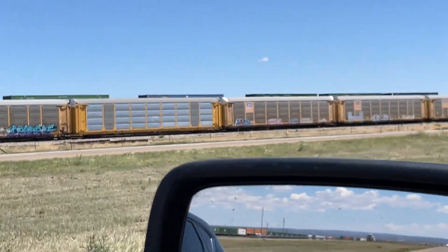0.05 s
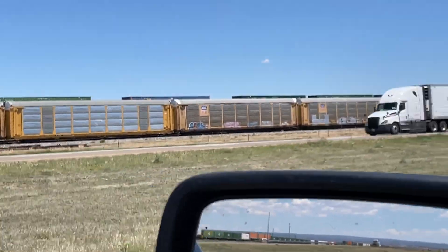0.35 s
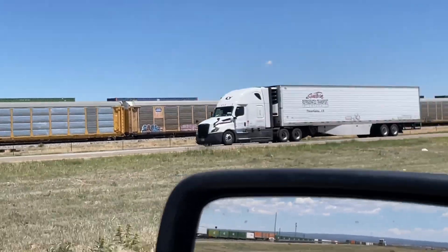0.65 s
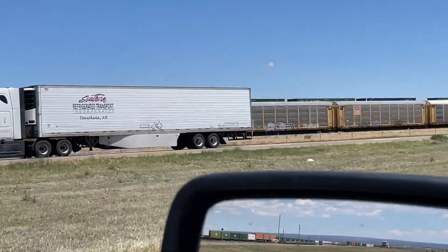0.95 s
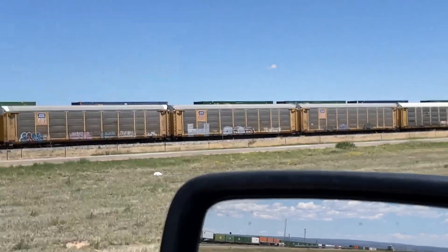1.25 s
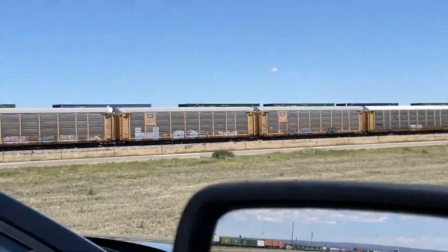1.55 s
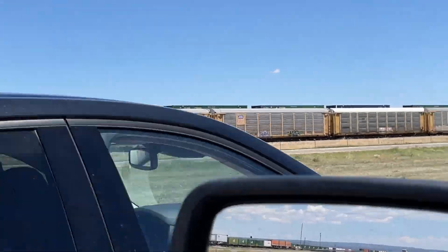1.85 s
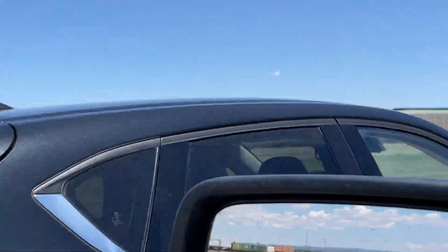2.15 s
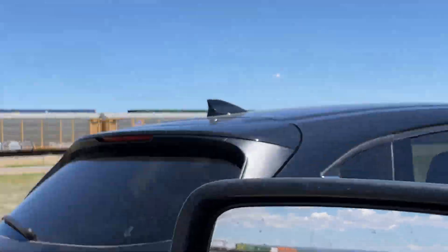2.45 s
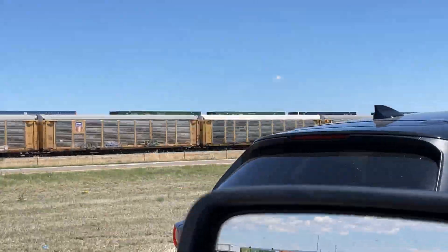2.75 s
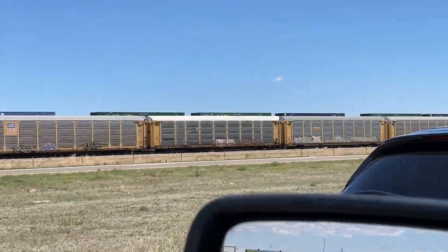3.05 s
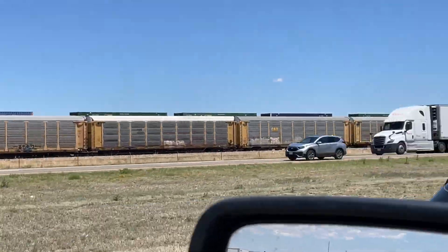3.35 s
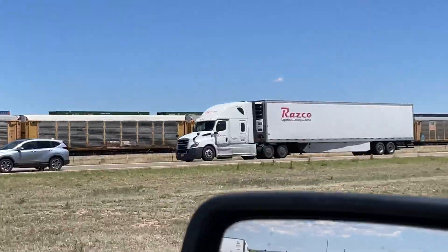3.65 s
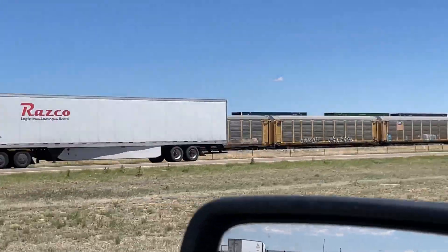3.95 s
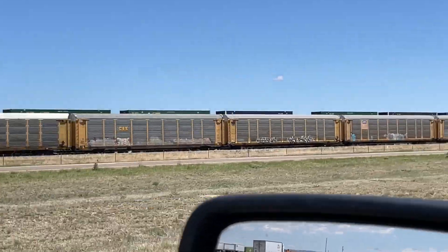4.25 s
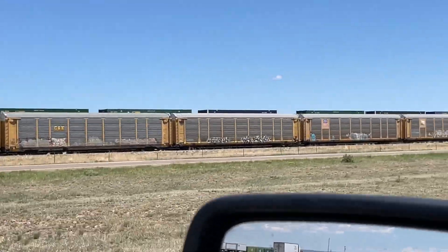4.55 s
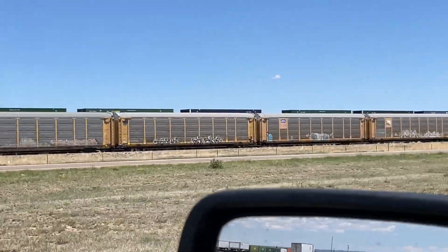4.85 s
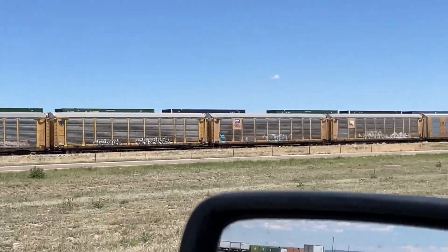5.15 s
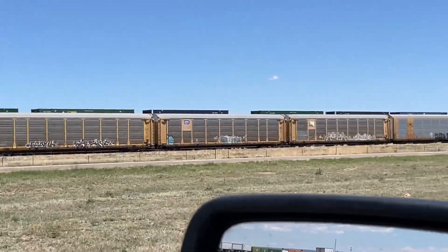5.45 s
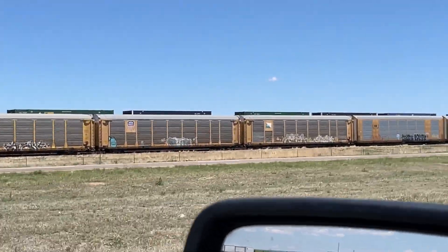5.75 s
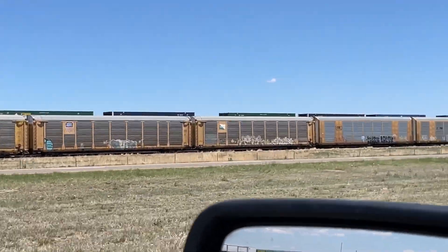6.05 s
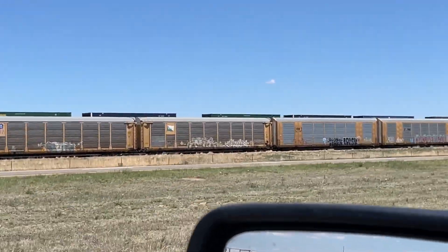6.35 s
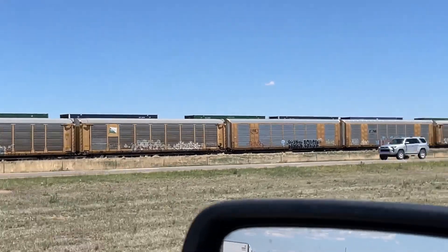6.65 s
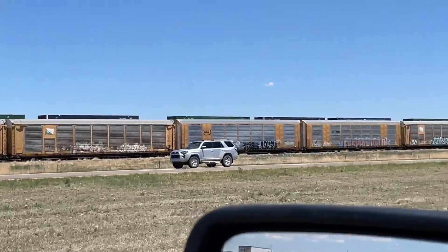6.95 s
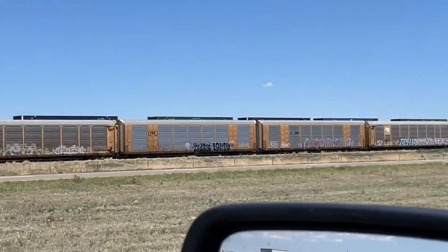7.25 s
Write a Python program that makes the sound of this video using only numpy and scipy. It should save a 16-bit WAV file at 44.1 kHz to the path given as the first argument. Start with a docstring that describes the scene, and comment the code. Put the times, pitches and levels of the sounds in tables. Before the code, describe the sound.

Heard through a phone at the open window of a moving car, a heavy, fluttering wind rumble runs from start to end over tyre noise and airy hiss. The road roar rises as a vehicle passes early on, then again more faintly. Sharp wind pops strike the microphone, the hardest briefly dulling the other noise, and something loose squeaks and chatters lightly on the bumps.

```python
"""At the open side window of a car at highway speed, heard through a phone's two microphone ports.
Air buffets the opening into a deep throb, the slipstream hisses, and eddies pop and knock on the mic.
Tyres roar, and the roar swells twice as other vehicles go by.
A loose fitting in the car squeaks and chatters on the bumps.
Sharp pops duck everything above the bass, and a limiter holds the peaks down."""
import sys
import numpy as np
from scipy import signal
from scipy.fft import rfft, irfft
from scipy.io import wavfile
from scipy.ndimage import uniform_filter1d, minimum_filter1d

SR = 44100
rng = np.random.default_rng(int(sys.argv[2]) if len(sys.argv) > 2 else 0)


def unload_audio(sound):
    """Save the sound as a 16-bit wav file, at the path given as the first command line argument."""
    columns = np.transpose(np.atleast_2d(sound))
    # keep every value between -1 and 1, then stretch to whole-number steps
    steps = np.round(np.clip(columns, -1, 1) * 32767)
    wavfile.write(sys.argv[1], SR, steps.astype(np.int16))


N = 322371
T = np.arange(N) / SR
FREQS = np.arange(N // 2 + 1) * SR / N
LEFT_RIGHT = np.array([[1], [-1]])


def undb(db):
    """Decibels to gain."""
    return 10 ** (np.asarray(db) / 20)


def unit(x):
    """Scale to rms 1."""
    return x / np.sqrt(np.mean(x ** 2))


def pan(lean_db):
    """Stereo gains that put the left lean_db above the right."""
    return undb(lean_db * LEFT_RIGHT / 2)


def automation(table):
    """Join (time, value) breakpoints at every sample."""
    return np.interp(T, *np.transpose(table))


def across(points):
    """Join (frequency, value) breakpoints over log frequency."""
    hz, value = np.transpose(points)
    return np.interp(np.log(FREQS + 1), np.log(hz), value)


def eq(x, response):
    """Filter by a frequency response."""
    return irfft(rfft(x) * response, N)


def high_cut(hz):
    """A soft low-pass response, 6 dB down at hz."""
    return 1 / (1 + (FREQS / hz) ** 4)


def noise(points):
    """Noise of a given spectrum, rms 1."""
    return unit(eq(rng.standard_normal(N), undb(across(points))))


def drift(rate):
    """Smooth random modulation, about rate changes a second, rms 1."""
    return unit(eq(rng.standard_normal(N), np.exp(-(FREQS / rate) ** 2)))


def add(track, start, sound):
    """Mix a short sound into a track at start seconds."""
    first = int(np.clip(start * SR, 0, N))
    track[first:first + len(sound)] += sound[:N - first]


# centre pitch of the throb: (time [s], pitch [Hz])
THROB_PITCH = [(0, 77.4), (.3, 76.2), (.62, 87.7), (.78, 66), (.95, 86.1), (1.3, 80.53), (1.55, 72.95),
               (2.0, 76.24), (2.17, 91.2), (2.38, 86.86), (2.5, 73.74), (3.0, 73), (3.48, 65.18),
               (3.63, 84.06), (3.93, 71.02), (4.25, 81), (4.4, 67.75), (4.72, 69), (4.92, 80.17),
               (5.32, 81), (5.58, 70), (6.15, 80.35), (6.45, 70), (6.78, 83.26), (7.0, 73.1), (7.3, 87.3)]
# boom of the cabin air: (frequency [Hz], relative level [dB])
CABIN_SPECTRUM = [(10, -16.5), (22, -20.5), (32, -12.5), (45, -8), (58, 2.5), (80, -3), (100, .5),
                  (125, -7), (160, -17), (220, -26.5), (300, -37), (600, -120)]
# colour of the turbulent flutter: (frequency [Hz], relative level [dB])
FLUTTER_SPECTRUM = [(70, -26), (130, -1.5), (220, 1.5), (350, -8), (600, -16.5), (1500, -29), (4000, -70.5)]
# fader ride on the flutter: (time [s], level [dB])
FLUTTER_LEVEL = [(0, -28.5), (1.0, -26.5), (1.6, -24), (2.1, -29.5), (2.9, -25.5), (3.8, -25), (4.4, -29.5),
                 (5.3, -26.5), (6.2, -27.5), (7.3, -22.5)]


def buffet(level_db=-6.5, wander_hz=1.509, width_hz=12, steady_s=0.14, hold_s=0.04, knee=1.54):
    """Vortices shed at the window edge pump the cabin air at a wandering rate; turbulence flutters."""
    pitch = automation(THROB_PITCH) + wander_hz * drift(2.59)
    phase = 2 * np.pi * np.cumsum(pitch) / SR
    shedding = unit(drift(width_hz) * np.cos(phase) + drift(width_hz) * np.sin(phase))
    swing = unit(shedding + undb(-0.45) * noise(CABIN_SPECTRUM))
    # the steady airstream feeds it evenly, and its largest swings saturate
    swing = swing / np.sqrt(uniform_filter1d(swing ** 2, int(steady_s * SR) + 1))
    strength = uniform_filter1d(np.abs(signal.hilbert(swing)), int(hold_s * SR) + 1)
    swing = unit(swing / (1 + (strength / knee) ** 4) ** (1 / 4))
    side = undb(-17) * noise(CABIN_SPECTRUM) * LEFT_RIGHT
    throb = (swing + side) * undb(level_db) * pan(0.5)
    flicker = undb(6 * drift(41))
    turbulence = noise(FLUTTER_SPECTRUM) + undb(-22) * noise(FLUTTER_SPECTRUM) * LEFT_RIGHT
    return throb + undb(automation(FLUTTER_LEVEL)) * unit(flicker * turbulence)


# colour of the tyre roar: (frequency [Hz], relative level [dB])
ROAD_SPECTRUM = [(150, 4.5), (300, 3.5), (480, 1), (620, 3), (780, 2), (860, 4.5), (950, -1), (1030, 1.5),
                 (1190, 3), (1270, -0.5), (1450, -3.5), (1750, -13.5), (2500, -21), (4000, -26),
                 (7000, -35)]
# its stereo width: (frequency [Hz], side minus mid [dB])
ROAD_WIDTH = [(200, -9), (400, -7), (650, -2.5), (1000, -7), (2000, -14.5)]
# its lean to the window: (frequency [Hz], left minus right [dB])
ROAD_PAN = [(200, 0.92), (500, 2), (1100, 6), (2000, 0.5)]
# pass-bys: (time when nearest [s], level [dB], fall to half power [s])
PASS_BYS = [(1.58, -26, 0.49), (3.85, -35, 0.84)]


def road(tyres_db=-27, ease_db_per_s=0.34, waver_db=0.5):
    """This car's tyres roar and slowly ease off; passing vehicles swell and fade with distance."""
    side = eq(noise(ROAD_SPECTRUM), undb(across(ROAD_WIDTH)))
    roar = eq(noise(ROAD_SPECTRUM) + side * LEFT_RIGHT, pan(across(ROAD_PAN)))
    own_power = undb(tyres_db - ease_db_per_s * T) ** 2
    passing_power = sum(undb(db) ** 2 / (1 + ((T - nearest) / half_s) ** 2)
                        for nearest, db, half_s in PASS_BYS)
    return roar * np.sqrt(own_power + passing_power) * undb(waver_db * drift(4.8))


# colour of the slipstream: (frequency [Hz], relative level [dB])
HISS_SPECTRUM = [(900, -11.5), (2000, 12), (3200, 8.5), (4500, 3), (6000, -0.5), (7300, 3), (8700, 3),
                 (10500, 1.5), (12000, -5.5), (14500, -2.5), (16000, -9.5)]
# its stereo width: (frequency [Hz], side minus mid [dB])
HISS_WIDTH = [(2000, -15.5), (4500, -3.5), (8000, -17), (11000, -35)]
# airflow past the window, riding the hiss: (time [s], treble gain [dB])
AIRFLOW_RIDE = [(0, 5), (.65, 4), (1.3, 7), (2.15, 4.5), (3.15, 0.2), (4.6, -2), (5.3, 1), (6.4, -3.5),
                (7.05, -0.5), (7.3, 5)]


def slipstream(level_db=-45.5, flicker_db=1.5, mid_share=0.66, treble_hz=5500):
    """Air shears past the mirror and window frame; more airflow makes it louder and brighter."""
    hiss = noise(HISS_SPECTRUM) + eq(noise(HISS_SPECTRUM), undb(across(HISS_WIDTH))) * LEFT_RIGHT
    mids = eq(hiss, high_cut(treble_hz))
    flow_db = automation(AIRFLOW_RIDE)
    rush = mids * undb(mid_share * flow_db) + (hiss - mids) * undb(flow_db)
    return rush * undb(level_db + flicker_db * drift(27))


# squeak cues: (time [s], relative level [dB], rise [s], trim on the low partials [dB])
SQUEAK_CUES = [(0.16, -46.5, .03, -3), (0.785, -40, 0.031, -4), (1.922, -49, 0.023, -5),
               (2.525, -52, .025, -3), (3.365, -47, 0.023, 1), (3.635, -50, 0.018, 0),
               (4.22, -38.5, 0.017, -12), (5.095, -44.5, 0.025, -5), (5.378, -47.5, .02, 3),
               (5.972, -42.5, .04, 0.5), (6.818, -47, .02, 0), (7.09, -49, .024, -3)]
# the notes in a squeak: (frequency [Hz], relative level [dB])
SQUEAK_PARTIALS = [(2600, -5.5), (3967, -6.5), (4360, -12), (5163, -0.5), (5430, -11.5), (7305, -18),
                   (7806, -15), (10244, -17), (13232, -24), (14583, -23)]


def squeaks(gain_db=2, scrape_db=-4, low_hz=4700, waver=0.004, rough_db=1.8):
    """The loose fitting rubs and sings briefly on nearly steady partials, with a little dry scrape."""
    rub, low_rub = np.zeros((2, N))
    for start, db, rise, low_db in SQUEAK_CUES:
        age = T[:SR // 4] / rise
        swell = undb(db) * age ** 2 * np.exp(2 * (1 - age))
        add(rub, start, swell)
        add(low_rub, start, undb(low_db) * swell)
    scrape = noise([(1500, -16.0), (2600, -5.5), (8000, -7.0), (15000, -3.5)])
    out = rub * undb(scrape_db) * scrape
    for hz, db in SQUEAK_PARTIALS:
        phase = 2 * np.pi * np.cumsum(hz * (1 + waver * drift(220))) / SR
        roughness = unit(undb(rough_db * drift(90)))
        envelope = low_rub if hz < low_hz else rub
        out += envelope * undb(db) * roughness * np.sin(phase)
    return out * undb(gain_db) * pan(2)


def eddy(hz, end_hz, length, fall_s=0.001304, attack_s=0.0005, rough=0.46, crack_hz=2250):
    """An eddy pops on the port: a ragged flick, then pressure swings that drop in pitch and die."""
    t = T[:SR // 25]
    flick = np.exp(-t / fall_s)
    pitch = end_hz + (hz - end_hz) * flick
    swings = np.sqrt(end_hz / pitch) * np.sin(2 * np.pi * np.cumsum(pitch) / SR)
    ragged = unit(signal.sosfilt(signal.butter(4, hz, fs=SR, output="sos"), rng.standard_normal(len(t))))
    envelope = (1 - np.exp(-t / attack_s)) * np.exp(-(t / length) ** 3)
    dull = signal.butter(6, crack_hz, fs=SR, output="sos")
    return signal.sosfilt(dull, envelope * (swings + rough * np.sqrt(flick) * ragged))


# strong wind pops: (time [s], level [dB], starting pitch [Hz], final pitch [Hz], length [s])
EDDY_CUES = [(0.303, -15.5, 600, 298, 0.0062), (0.542, -9.5, 1080, 447, .004),
             (0.556, -10.5, 700, 298, 0.0053), (0.94, -11, 500, 256.8, 0.0065),
             (1.426, -10, 600, 230, 0.0062), (1.548, -9.5, 906, 447, .005),
             (2.4275, -3.5, 1602, 294, 0.0075), (2.694, -9.5, 520, 246, 0.0074),
             (2.821, -16.5, 800, 409.7, 0.0082), (2.939, -14, 1210, 296, 0.0056),
             (3.055, -16.5, 697.6, 277.5, 0.0047), (3.623, -5.5, 800, 389.4, 0.0069),
             (3.6755, -6.5, 1280, 254.7, .011), (4.044, -9, 1170, 274, 0.0099),
             (4.254, -7.5, 2200, 268, 0.01), (4.267, -6.5, 794, 380, 0.0054), (4.48, -14, 492, 340, 0.011),
             (4.539, -12, 590.6, 301.4, 0.0058), (4.557, -11, 598.7, 321.5, 0.0056),
             (4.604, -13, 700, 328, 0.0047), (5.511, -12, 816, 295, 0.0072), (5.685, -16, 800, 403, 0.0036),
             (5.6885, -2, 1930, 304, 0.0105), (5.691, -9, 776, 599.4, 0.0036),
             (5.703, -11, 700, 420, 0.0075), (5.722, -14, 650, 400, 0.0031),
             (6.156, -13, 917.4, 337, 0.0067), (7.065, -14, 499.6, 260, 0.0074)]


def eddies(small_count=30, small_db=-25, scatter_db=3):
    """Strong eddies strike the microphone on cue, among small ones scattered at random."""
    out = np.zeros(N)
    for start, db, hz, end_hz, length in EDDY_CUES:
        add(out, start, undb(db) * eddy(hz, end_hz, length))
    for when, size, pitch in rng.random((small_count, 3)):
        pop = eddy(350 + 450 * pitch, 220 + 180 * pitch, length=0.0037)
        add(out, when * N / SR, undb(small_db + scatter_db * size) * pop)
    return out * pan(1)


# bumps that shake the fitting: (time [s], level [dB], decay [s], relative level of the low modes [dB])
CHATTER_CUES = [(.325, -27, 0.026, -3), (.340, -31, 0.011, 13.5), (.78, -39, 0.044, 5),
                (1.623, -38.5, 0.064, 0), (2.07, -32.5, 0.028, 5), (2.504, -43, 0.056, 4),
                (3.354, -39, 0.045, -1), (3.782, -30.5, 0.032, 1), (4.213, -38, 0.05, 1),
                (5.095, -37.5, 0.063, -4), (5.529, -29, 0.029, 3), (5.967, -37.5, 0.018, 2),
                (6.403, -31, 0.019, -3), (6.622, -34, 0.032, 0.5), (6.709, -29.5, .028, -4),
                (6.808, -33, 0.024, 1), (7.233, -32, 0.18, 0.5)]
# ring of the fitting: (frequency [Hz], bandwidth [Hz], relative level [dB])
FITTING_MODES = [(3010, 46, 6), (3280, 60, 4.5), (3660, 50, 4.5), (4030, 70, -7.5), (4120, 120, -2.5),
                 (4610, 88, -0.5), (4880, 42, 0.5), (5230, 80, -4), (6640, 78, 1.5), (7060, 86, 3.5),
                 (7260, 80, 7), (7870, 110, 7.5), (8120, 95, 3), (8650, 81, -1), (9200, 74, 2.5),
                 (9770, 130, -1.5), (11900, 100, -4.5), (12550, 120, -12), (13676, 70, -13),
                 (14600, 330, -18)]


def chatter(stop_s=0.012, build_s=0.0034, low_hz=4000, detune=0.0026, grain_db=4, dry_db=-11):
    """Each bump shakes the loose fitting into a dying run of dense contacts that ring its modes."""
    t = T[:SR // 2]
    freqs = np.fft.rfftfreq(len(t), 1 / SR)
    click_db = across([(2000, -12.5), (3000, 9.0), (5800, 0.5), (8500, -3.0),
                       (11000, -11.5), (14700, -3), (16000, -13.5)])
    click = np.interp(freqs, FREQS, undb(dry_db + click_db))
    low_band = 1 / (1 + (freqs / low_hz) ** 20)
    grain = unit(undb(grain_db * drift(340)))
    mid, side = np.zeros((2, N))
    for start, db, decay, low_db in CHATTER_CUES:
        # it seats a little differently each time, which shifts its modes
        shifts = 1 + detune * rng.standard_normal(len(FITTING_MODES))
        body = click + sum(undb(mode_db) / (1 + 2j * (freqs - hz * shift) / width)
                           for (hz, width, mode_db), shift in zip(FITTING_MODES, shifts))
        contacts = np.roll(grain, -int(start * SR))[:len(t)] * rng.standard_normal((2, len(t)))
        run = undb(db) * np.exp(-t / decay - np.maximum(t - 2 * decay, 0) / stop_s) * contacts
        # the heavier, low modes take a moment to build up
        late = 0.8 * undb(low_db) * run * (1 - np.exp(-t / build_s))
        drive = rfft(run) * (1 - low_band) + rfft(late) * low_band
        ringing = irfft(drive * body, len(t)) / np.sqrt(np.mean(np.abs(body) ** 2))
        add(mid, start, ringing[0])
        add(side, start, ringing[1])
    return mid + undb(-13) * side * LEFT_RIGHT


# brief whines in the road noise: (time [s], level [dB], length [s], pitch [Hz])
WHINE_CUES = [(1.03, -28, 0.17, 594), (4.495, -30, 0.23, 588)]


def whines(waver=0.0047):
    """A faint, slightly wavering tone swells out of the road noise and sinks back."""
    out = np.zeros(N)
    for start, db, length, hz in WHINE_CUES:
        swell = np.sin(np.linspace(0, np.pi, int(length * SR)))
        phase = 2 * np.pi * np.cumsum(hz * (1 + waver * drift(30)[:len(swell)])) / SR
        add(out, start, undb(db) * swell * np.sin(phase))
    return out * pan(3)


# knocks under the hardest pops: (time [s], relative level [dB], rattle decay [s], high cut [Hz])
KNOCK_CUES = [(2.4277, -14, 0.0019, 3800), (3.6235, -13, 0.0026, 3600), (3.676, -15, .002, 3400),
              (4.254, -0.5, 0.0028, 4400), (5.6895, -4, 0.00095, 4900)]
# their hollow ring: (frequency [Hz], bandwidth [Hz], relative level [dB])
HOLLOW_MODES = [(520, 130, -6.5), (738, 110, 2), (1345, 150, -5), (1780, 290, -6), (2020, 230, -1.5),
                (3020, 400, -17), (3770, 350, -17), (4550, 300, -24)]


def knocks(rattle=0.037):
    """The hardest eddies jolt something hollow near the mic: a cushioned blow and a rattle ring it."""
    t = T[:SR // 20]
    body = sum(undb(db) * np.exp(-np.pi * width * t) * np.sin(2 * np.pi * hz * t)
               for hz, width, db in HOLLOW_MODES)
    body /= np.abs(body).max()
    out = np.zeros(N)
    for start, db, decay, top_hz in KNOCK_CUES:
        blow = (t == 0) + rattle * rng.standard_normal(len(t)) * t / decay * np.exp(1 - t / decay)
        cushioned = signal.sosfilt(signal.butter(8, top_hz, fs=SR, output="sos"), blow)
        add(out, start, undb(db) * signal.fftconvolve(cushioned, body))
    return out * pan(1)


def scene(breakup=3, settle_s=0.0022):
    """Mix wind, road and the loose fitting; a strong eddy breaks up the buffeting for a moment."""
    pops = eddies()
    size = int(settle_s * SR) + 1
    pop_envelope = uniform_filter1d(uniform_filter1d(np.abs(pops[0]), size), size)
    wind = buffet() / (1 + breakup * pop_envelope)
    return wind + pops + knocks() + road() + whines() + slipstream() + chatter() + squeaks()


def duck(x, threshold_db=-23, slope=0.8, attack_s=0.0067, lag_s=0.011, release_db_per_s=22):
    """Gain control above the bass: just after a sharp pop or knock it turns down, then creeps back."""
    size, lag = int(attack_s * SR) + 1, int(lag_s * SR)
    sidechain = eq(x.mean(axis=0), 1 - high_cut(hz=900))
    power = uniform_filter1d(sidechain ** 2, size)
    level_db = 10 * np.log10(np.maximum(power, undb(threshold_db) ** 2))
    recovery = release_db_per_s * T
    cut_db = np.maximum.accumulate(slope * (level_db - threshold_db) + recovery) - recovery
    late_cut_db = signal.lfilter(np.r_[np.zeros(lag), np.ones(size) / size], 1, cut_db)
    bass = eq(x, high_cut(hz=200))
    return bass + (x - bass) * undb(-late_cut_db)


# phase between the two microphone ports: (frequency [Hz], left minus right [rad])
MIC_PHASE = [(20, 0), (5000, 0), (6800, -.7), (7400, -1.9), (8200, -2.5), (8800, -np.pi), (9600, -3.9),
             (11000, -4.6), (12000, -5.8), (13000, -2 * np.pi)]


def record(dry, ceiling=0.99, lookahead_s=0.00097, top_hz=15750):
    """The ports differ in treble phase; pops duck the gain; a limiter holds peaks; the top is cut."""
    right_shift = np.exp(1j * across(MIC_PHASE) * np.array([[0], [-1]]))
    ports = duck(eq(dry, right_shift))
    reach = int(lookahead_s * SR) + 1
    safe_gain = ceiling / np.maximum(np.abs(ports).max(axis=0), ceiling)
    limiter_gain = uniform_filter1d(minimum_filter1d(safe_gain, reach), reach)
    top_cut = signal.ellip(10, 0.1, 80, top_hz, fs=SR, output="sos")
    return signal.sosfilt(top_cut, ports * limiter_gain)


dry = scene()
out = record(dry)
unload_audio(out)
```